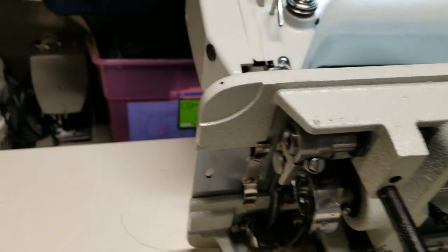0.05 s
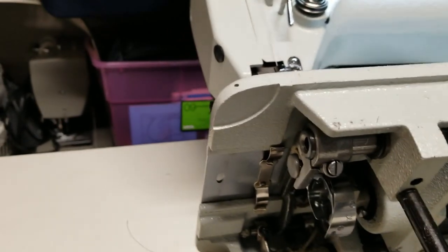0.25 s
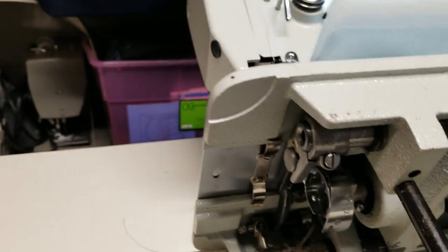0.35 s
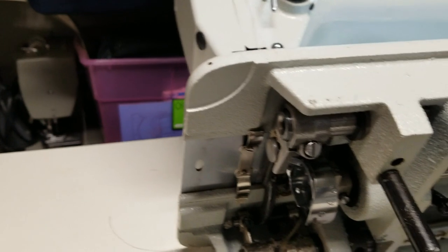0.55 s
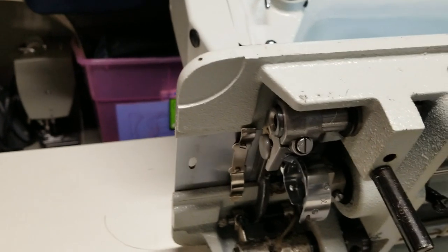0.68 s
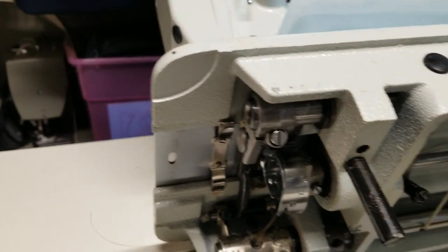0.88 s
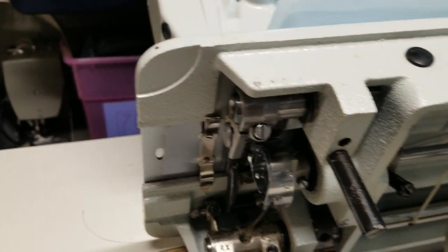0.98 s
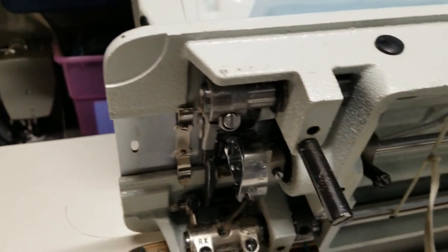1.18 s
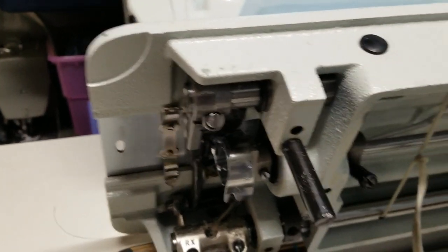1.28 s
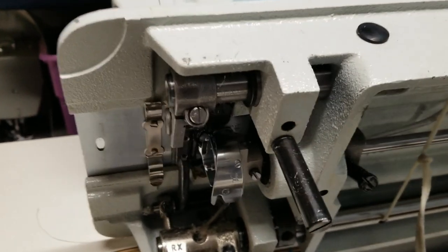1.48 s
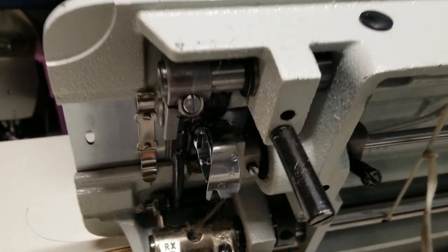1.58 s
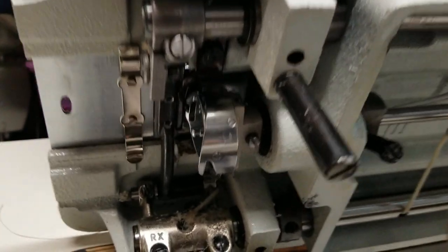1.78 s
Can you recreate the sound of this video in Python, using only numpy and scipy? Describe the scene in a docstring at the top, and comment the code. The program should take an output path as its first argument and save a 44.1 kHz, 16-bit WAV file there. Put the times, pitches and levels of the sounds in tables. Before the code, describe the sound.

Sewing machine mechanism turned by hand, clicking and rattling, ending in two sharp metal snaps.

```python
"""Sewing machine turned by hand.

A tipped-back machine is turned over once, close by in a quiet room. Slack in the linkage
clacks, the shaft knocks and growls, and the gears rattle through the cast body. Steel scrapes
briefly on steel, and two sharp snaps of a sprung part end the turn. Each contact rings damped
modes or a dense wash of resonances. Table rumble and hiss lie behind."""
import sys
import numpy as np
from scipy import signal
from scipy.fft import rfft, irfft, next_fast_len
from scipy.io import wavfile

SR = 44100
rng = np.random.default_rng(int(sys.argv[2]) if len(sys.argv) > 2 else 0)


def bounce(signal):
    """Save signal as a 16-bit WAV file at the path given by the first command-line argument."""
    frames = np.transpose(np.atleast_2d(signal))
    limited = np.clip(frames, -1, 1)
    pcm = np.round(limited * 32767).astype(np.int16)
    wavfile.write(sys.argv[1], SR, pcm)


N = 81585
TIME_S = np.arange(N) / SR
RING_N = int(0.25 * SR)
RING_TIME_S = np.arange(RING_N) / SR

# dense resonances of the steel links: (frequency [Hz], density [dB])
LINK_COLOUR = [(300, -3), (1500, 3), (2800, 1.5), (4000, -0.5), (6500, -7.5), (8000, -11.5), (16000, -57)]
# room reflections: (frequency [Hz], density [dB])
REFLECTION_COLOUR = [(50, -8), (500, 5), (3000, -2), (8000, -2.5), (16000, -2)]


def clacks():
    """Joints take up slack: body, links and struck part ring together; light contacts are duller."""
    # (time [s], relative body, link and tick levels [dB], part ring [Hz], relative ring level [dB])
    contacts = [(0.2071, -51.5, -63, -99, 3350, -48.5), (0.2323, -37, -47, -73, 1630, -44),
                (0.3066, -37, -49, -78, 1690, -43.5), (0.357, -42, -45.5, -67.5, 6080, -54),
                (0.391, -35, -26, -46, 3385, -33), (.4172, -35, -34.5, -53.5, 3384, -32.5),
                (0.4988, -72, -78, -96, 2300, -60), (.562, -43.5, -49.5, -40, 3096, -47.5),
                (0.604, -46.5, -47.5, -66, 3404, -62), (.6163, -41, -54, -69, 1700, -42),
                (0.6804, -47, -78, -81, 2154, -40.5), (0.708, -46.5, -33, -44, 4880, -34),
                (0.8194, -40.5, -47.5, -53.5, 6340, -47.5), (0.8924, -37, -44, -70, 3430, -53),
                (0.942, -43, -39.5, -70, 6580, -46), (0.977, -66, -66, -79, 4480, -61),
                (1.107, -51, -44, -62.5, 4150, -47.5), (1.149, -31, -38, -58, 2243, -30.5),
                (1.157, -32.5, -49, -70, 1470, -29.5), (1.185, -34, -39.5, -56, 2230, -33),
                (1.194, -34, -35, -43.5, 6760, -40.5), (1.208, -36, -38.5, -33.5, 13100, -31),
                (1.213, -36.5, -30.5, -34.5, 12600, -44), (1.278, -44, -42, -37.5, 13500, -39),
                (1.289, -58, -38.5, -42, 12900, -53), (1.332, -55, -44, -42.5, 12930, -37.5),
                (1.3724, -52.5, -50.5, -61, 3200, -52)]
    low_hz, hard_top_hz = 216, 7400  # body and links radiate little outside this range
    hard_db, db_per_octave = -43, 11  # the top edge falls for contacts below hard_db
    highpass = signal.butter(2, low_hz, "high", fs=SR, output="sos")
    out, count = np.zeros(N), len(contacts)
    for contact, cast, steel, crack in zip(contacts, body(count), links(count), tick(count)):
        start_s, body_db, link_db, tick_db, part_hz, part_db = contact
        top_hz = hard_top_hz * 2 ** np.clip((link_db - hard_db) / db_per_octave, -1, 0)
        lowpass = signal.butter(6, top_hz, fs=SR, output="sos")
        frame = signal.sosfilt(lowpass, from_db(body_db) * cast + from_db(link_db) * steel)
        part = from_db(part_db) * struck_part(part_hz, t60_s=0.033)
        add(out, start_s, 2 * (signal.sosfilt(highpass, frame) + from_db(tick_db) * crack + part))
    return out


def snaps():
    """A sprung part snaps over and back: each time, three quick cracks and one clear ring."""
    events = [(1.4164, -19.5, -40), (1.5514, -22.5, -41.5)]  # (time [s], level [dB], tick level [dB])
    touches = [(0, -0.5), (.0016, 2), (.0034, -12)]  # within one snap: (delay [s], gain [dB])
    # sprung part: (frequency [Hz], t60 [s], level in first snap [dB], level in second [dB])
    spring_modes = [(727, 0.036, -4.5, -22.5), (1228, 0.031, -19, -5.5), (1409, 0.075, -9, -14.5),
                    (2032, 0.033, -1.5, -10.5), (2637, 0.023, 2.5, -11), (2777, 0.025, -4.5, 1),
                    (3380, 0.027, 4.5, 2), (3915, 0.029, -1, -11), (4130, 0.019, 1, -7),
                    (5270, 0.014, 3.5, 4), (6830, 0.014, -18, -6)]
    build_s, wash_db = 0.0016, -15
    attack = 1 - np.exp(-RING_TIME_S / build_s)
    out, count = np.zeros(N), len(touches)
    for k, (start_s, db, tick_db) in enumerate(events):
        modes = [(hz, levels_db[k], t60_s) for hz, t60_s, *levels_db in spring_modes]
        clink = ringing(modes, count=1, spread_db=1)[0] * attack
        add(out, start_s, from_db(db) * unit_energy(clink))
        steel = from_db(db + wash_db) * wash(LINK_COLOUR, t60_s=0.14, count=count)
        cracks = steel + from_db(tick_db) * tick(count)
        for (delay_s, touch_db), crack in zip(touches, cracks):
            add(out, start_s + delay_s, from_db(touch_db) * crack)
    return out


def scrape():
    """Steel catches and slips on steel in a dense run of bright grains."""
    pressure = [(1.185, -110), (1.21, -20.5), (1.23, -30), (1.25, -27.5), (1.29, -29.5), (1.328, -31),
                (1.345, -38.5), (1.39, -60), (1.42, -110)]  # (time [s], level [dB])
    colour = [(250, -5.5), (1400, 4.5), (3300, 7), (4300, -4), (4900, 0.5), (5500, 2), (6300, 4),
              (7700, -15), (8400, -17.5), (8850, -4), (9400, -11), (12000, -9), (13100, 2.5), (14300, -16),
              (15200, -41)]  # steel resonances: (frequency [Hz], density [dB])
    return chatter(wash(colour, t60_s=0.013, count=3), pressure, total_per_s=650)


def gear_rattle(count=3):
    """Gear teeth chatter at several places, each with its own share of the resonances."""
    effort = [(.38, -110), (.42, -38.5), (.46, -47), (.52, -85), (.57, -51.5), (.63, -45), (.72, -38),
              (.8, -41), (.87, -41.5), (.95, -31), (1.0, -36.5), (1.08, -31.5), (1.13, -33.5),
              (1.16, -23.5), (1.21, -40.5), (1.24, -40), (1.32, -35.5), (1.35, -49), (1.45, -100)]  # (time [s], level [dB])
    places = body(count) + from_db(-21) * links(count) + from_db(-29.5) * tick(count)
    return chatter(places, effort, total_per_s=170)


def gear_teeth():
    """Single teeth catch and drop: dry ticks that stand out of the rattle."""
    catches = [(0.6378, -38.5, 1720), (0.7726, -38.5, 1650), (0.8501, -42, 2180), (0.9198, -30.5, 1550),
               (0.9533, -34, 1524), (0.9975, -40, 2230), (1.0128, -37.5, 2214), (1.0426, -36, 2150),
               (1.057, -32, 2210), (1.083, -41, 2230), (1.1456, -24.5, 1925)]  # (time [s], level [dB], ring [Hz])
    colour = [(200, -20), (700, 8.5), (2300, -2), (3400, -7), (4500, -23), (6500, -13.5), (8500, -45)]  # dry crack: (frequency [Hz], density [dB])
    t60_s, ring_db = 0.05, -3
    out = np.zeros(N)
    for (start_s, db, hz), crack in zip(catches, wash(colour, t60_s, len(catches))):
        add(out, start_s, from_db(db) * (crack + from_db(ring_db) * struck_part(hz, t60_s)))
    return out


def shaft_knocks():
    """The shaft knocks in its oiled bearings: a dull body thud and a hollow ring."""
    # (time [s], relative thud level [dB], ring [Hz], relative ring level [dB])
    knocks = [(.224, -44.5, 825, -64), (.247, -43, 546, -39.5), (.319, -52.5, 538, -38.5),
              (0.3922, -42, 940, -29), (.4087, -38.5, 948, -28.5), (0.5589, -41.5, 553, -41),
              (.637, -34, 546, -37), (.702, -57, 547, -40), (.772, -39.5, 547, -39.5), (.85, -40, 548, -35),
              (.925, -38, 540, -38), (1.078, -37, 408.2, -33.5), (1.317, -43, 652, -37),
              (1.608, -42, 640, -77)]
    decay = [(550, 0.27), (930, 0.089)]  # higher rings die sooner: (frequency [Hz], t60 [s])
    lowpass = signal.butter(2, 930, fs=SR, output="sos")
    thuds = signal.sosfilt(lowpass, body(len(knocks)))
    out = np.zeros(N)
    for (start_s, thud_db, hz, ring_db), thud in zip(knocks, thuds):
        hollow = from_db(ring_db) * struck_part(hz, at_hz(decay, hz))
        add(out, start_s, 2 * (from_db(thud_db) * thud + hollow))
    return out


def body(count):
    """The cast body, struck at count places."""
    modes = [(281.7, -12.5, 0.18), (398.7, -11.5, 0.23), (539.8, -1, 0.21), (623, -5, 0.24),
             (737, -9.5, 0.087), (823, -7.5, 0.13), (922, -2, 0.045), (1156.7, 3, 0.13), (1410, -3, 0.22),
             (1586, -8.5, 0.14), (1630, -6.5, 0.15), (1750, -1, 0.13), (1945, -1.5, 0.083),
             (2200, 1.5, 0.13)]  # (frequency [Hz], level [dB], t60 [s])
    colour = [(50, -32), (120, -16.5), (250, -14.5), (450, -5.5), (900, 1.5), (1500, -1.5), (2300, -7),
              (3200, -10.5), (4500, -26.5), (8000, -54), (16000, -61)]  # dense resonances: (frequency [Hz], density [dB])
    return ringing(modes, count, spread_db=5) + from_db(1) * wash(colour, t60_s=0.14, count=count)


def links(count):
    """The steel links, struck at count places."""
    modes = [(2664, 11.5, 0.018), (3382, 17, 0.041), (3937, 3.5, 0.034), (4440, -11, 0.034),
             (4860, 8, 0.039), (5300, 9.5, 0.014), (6380, 4.5, 0.028), (6680, -1.5, 0.033)]  # (frequency [Hz], level [dB], t60 [s])
    return ringing(modes, count, spread_db=5) + from_db(-1) * wash(LINK_COLOUR, t60_s=0.11, count=count)


def tick(count):
    """The bright crack of hard contacts."""
    colour = [(1000, -17), (4000, -14), (6500, -8), (8000, -14.5), (9500, -7.5), (11500, -2.5), (13200, -7),
              (14500, -10.5), (16000, -47)]  # (frequency [Hz], density [dB])
    return wash(colour, t60_s=0.075, count=count)


def struck_part(hz, t60_s, contact_s=0.0007):
    """One part's ring, building up over the time of contact."""
    attack = 1 - np.exp(-(RING_TIME_S / contact_s) ** 2)
    return unit_energy(damped_sine(hz, t60_s) * attack)


def ringing(modes, count, spread_db):
    """Modes of alternating sign, with new strengths at each contact; one row per contact."""
    sines = [(-1) ** k * from_db(db) * damped_sine(hz, t60_s) for k, (hz, db, t60_s) in enumerate(modes)]
    strengths = from_db(spread_db * rng.standard_normal((count, len(modes))))
    return unit_energy(strengths @ np.array(sines))


def wash(colour, t60_s, count):
    """Close resonances dying together after a short crack; one row per contact."""
    crack_db, crack_t60_s = 4.5, 0.012
    cepstrum = irfft(np.log(from_db(at_hz(colour, bins_hz(RING_N)))), RING_N)
    causal_filter = np.exp(rfft(2 * cepstrum * (np.arange(RING_N) < RING_N // 2)))  # minimum phase
    envelope = from_db(-60 * RING_TIME_S / t60_s) + from_db(crack_db - 60 * RING_TIME_S / crack_t60_s)
    bursts = rng.standard_normal((count, RING_N)) * envelope
    return unit_energy(irfft(rfft(bursts) * causal_filter, RING_N))


def chatter(responses, curve, total_per_s):
    """Each response is driven by its own run of contacts, following a level curve."""
    count = len(responses)
    gain = level(curve) / np.sqrt(count)
    return sum(drive(grains(total_per_s / count) * gain, response) for response in responses)


def grains(per_s, spread_db=3.5):
    """Unevenly spaced contacts of random size; rms 1 through a unit_energy response."""
    jitter, polarity, size = rng.standard_normal((4000, 3)).T
    times_s = (np.arange(len(jitter)) + 0.5 * jitter) / per_s
    at = (times_s * SR).astype(int)
    inside = (at >= 0) & (at < N)
    impulses = np.sign(polarity) * from_db(spread_db * np.clip(size, -2, 2))
    force = np.zeros(N)
    force[at[inside]] = impulses[inside]
    return force / force.std() / np.sqrt(SR / 100)


def shaft_growl():
    """Low growl of the turning shaft."""
    curve = [(.52, -105), (.565, -40), (.72, -49.5), (.85, -36.5), (1.0, -39.5), (1.1, -37), (1.2, -41),
             (1.3, -49), (1.42, -49.5), (1.55, -72.5)]  # (time [s], level [dB])
    colour = [(40, -35), (100, -17.5), (150, -2), (220, -9.5), (285, 0.5), (335, -15.5), (410, 3.5),
              (520, 1), (800, -1.5), (3000, -80)]  # (frequency [Hz], density [dB])
    return level(curve) * noise(colour)


def table_rumble():
    """Low rumble of the table under the machine."""
    curve = [(0, -44), (.07, -57), (.13, -62), (.37, -52.5), (.42, -44.5), (.52, -59), (.64, -48),
             (.8, -57), (.92, -53), (1.0, -63), (1.08, -45.5), (1.35, -79), (1.43, -48.5), (1.52, -68.5),
             (1.65, -67), (1.85, -79)]  # (time [s], level [dB])
    colour = [(20, -38), (40, -2), (62, 2.5), (100, -0.5), (160, -4), (250, -11), (450, -31.5), (1200, -56),
              (16000, -74)]  # (frequency [Hz], density [dB])
    return level(curve) * noise(colour)


def stereo_pair(left):
    """The right microphone faces away: it hears the machine later, duller and partly by reflections."""
    shading = [(50, -14.5), (150, -12), (300, -7), (600, -8), (1100, -7), (2200, -14), (4000, -10),
               (8000, -22), (13000, -16)]  # right against left: (frequency [Hz], gain [dB])
    likeness = [(50, 0.7), (400, 1), (650, 1), (1100, 0.7), (2500, 0.47), (13000, 0.4)]  # (frequency [Hz], coherence [0..1])
    lag_s = 0.000444
    size = next_fast_len(N + RING_N, True)
    hz = bins_hz(size)
    direct = at_hz(likeness, hz)
    scatter = rfft(wash(REFLECTION_COLOUR, t60_s=0.12, count=1)[0], size)
    scatter /= np.sqrt(np.mean(np.abs(scatter) ** 2))
    blend = direct + np.sqrt(1 - direct ** 2) * scatter
    path = blend * from_db(at_hz(shading, hz)) * np.exp(-2j * np.pi * hz * lag_s)
    right = irfft(rfft(left, size) * path, size)[:N]
    return np.array([left, right])


def room_tail(stereo, gain_db=-17.5):
    """Short, faint reflections, different on each side."""
    tails = wash(REFLECTION_COLOUR, t60_s=0.22, count=2)
    wet = [drive(side, tail / np.linalg.norm(tail)) for side, tail in zip(stereo, tails)]
    return from_db(gain_db) * np.array(wet)


def room_hiss(right_db=-11.5):
    """Room hiss that rises during the turn, weaker on the right."""
    curve = [(0, -81.5), (.5, -74), (.75, -48.5), (1.4, -53), (1.65, -52.5), (1.85, -51.5)]  # (time [s], level [dB])
    colour = [(30, -26), (300, -4.5), (700, -8.5), (1100, -4.5), (1420, 11.5), (1900, -4.5), (2750, 1),
              (3500, -6), (4800, -4), (8000, -16.5), (12500, -13.5), (16000, -23)]  # (frequency [Hz], density [dB])
    return level(curve) * np.array([noise(colour), from_db(right_db) * noise(colour)])


def from_db(db):
    """Decibels to gain."""
    return 10 ** (np.asarray(db) / 20)


def level(curve):
    """Gain per sample from (time [s], level [dB]) points."""
    return from_db(np.interp(TIME_S, *np.transpose(curve)))


def at_hz(points, hz):
    """Read a table on a log-frequency axis."""
    points_hz, values = np.transpose(points)
    return np.interp(np.log(hz + 1), np.log(points_hz), values)


def bins_hz(size):
    """Bin frequencies of a real FFT."""
    return np.arange(size // 2 + 1) * SR / size


def noise(colour):
    """Coloured noise of rms 1."""
    size = next_fast_len(N, True)
    spectrum = rfft(rng.standard_normal(size)) * from_db(at_hz(colour, bins_hz(size)))
    x = irfft(spectrum, size)[:N]
    return x / x.std()


def damped_sine(hz, t60_s):
    """One freely decaying mode."""
    return from_db(-60 * RING_TIME_S / t60_s) * np.sin(2 * np.pi * hz * RING_TIME_S)


def unit_energy(response):
    """Scale each response to the energy of 10 ms at level 1."""
    return response / np.sqrt(np.sum(response ** 2, axis=-1, keepdims=True) / (SR / 100))


def drive(force, response):
    """Convolve a force with a response."""
    return signal.fftconvolve(force, response)[:N]


def add(out, start_s, sound):
    """Mix a short sound in at start_s."""
    at = int(np.clip(start_s * SR, 0, N - 1))
    out[at:at + len(sound)] += sound[:N - at]


def scene():
    """The machine on its table, with the room behind."""
    lows = table_rumble() + shaft_growl()
    contacts = clacks() + shaft_knocks() + gear_teeth() + gear_rattle() + scrape() + snaps()
    near = stereo_pair(contacts + lows)
    return near + room_hiss() + room_tail(near)


def record(dry):
    """Steady microphone hiss, then a steep treble cut."""
    colour = [(500, 3), (2400, -3), (3100, 7), (4500, -8), (8500, -17), (12400, 4), (16000, -10.5)]  # (frequency [Hz], density [dB])
    hiss_db, cutoff_hz = -73, 16000
    hiss = from_db(hiss_db) * np.array([noise(colour), noise(colour)])
    lowpass = signal.ellip(10, 0.1, 80, cutoff_hz, fs=SR, output="sos")
    return signal.sosfilt(lowpass, dry + hiss)


dry = scene()
out = record(dry)
bounce(out)
```